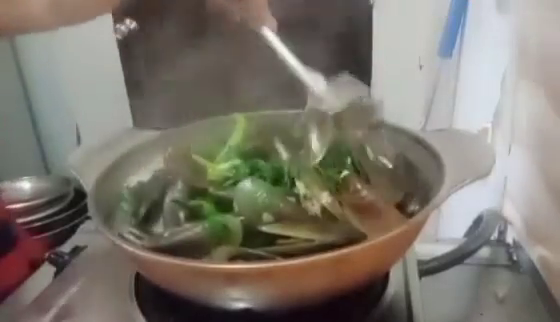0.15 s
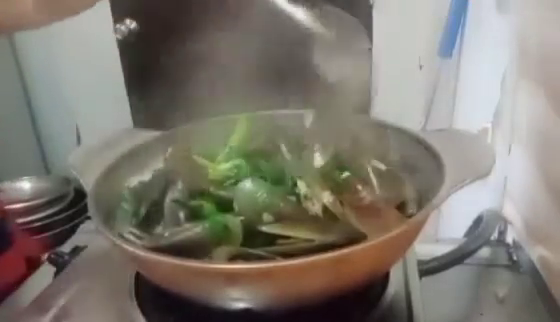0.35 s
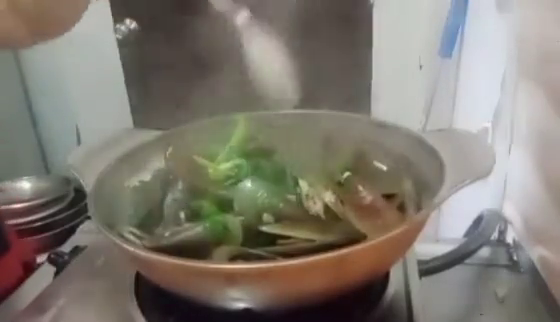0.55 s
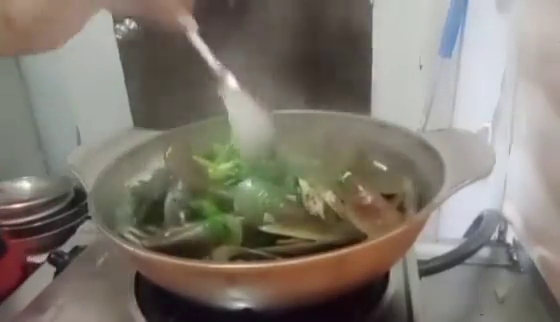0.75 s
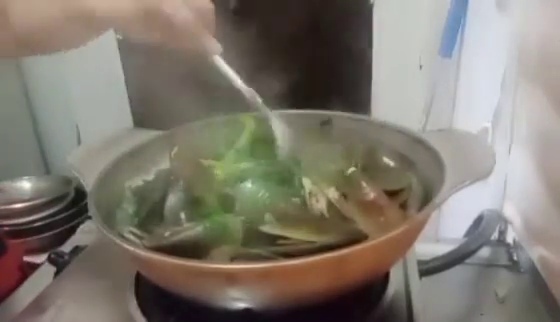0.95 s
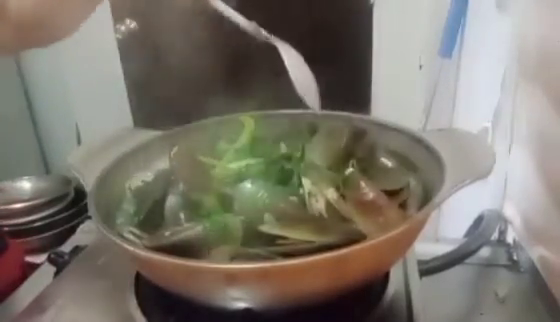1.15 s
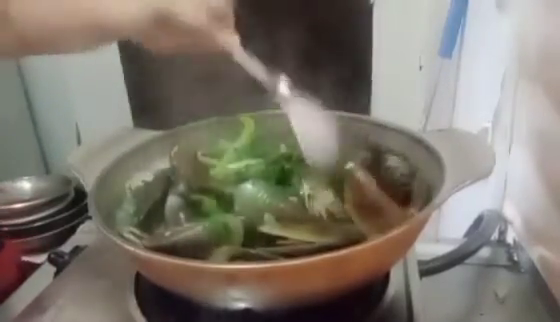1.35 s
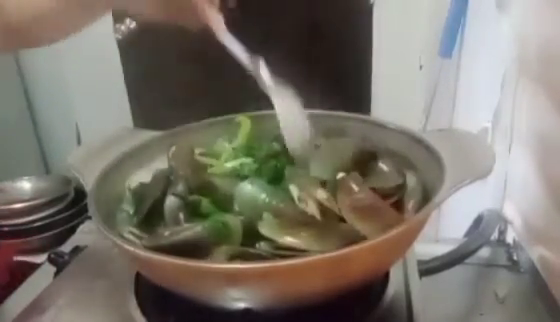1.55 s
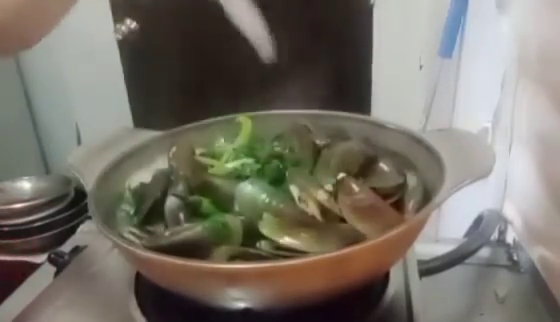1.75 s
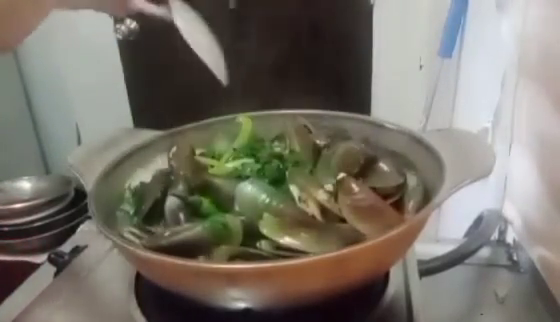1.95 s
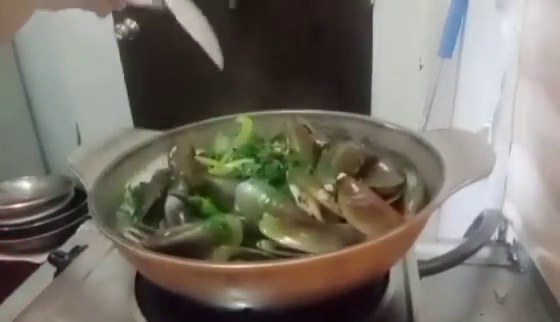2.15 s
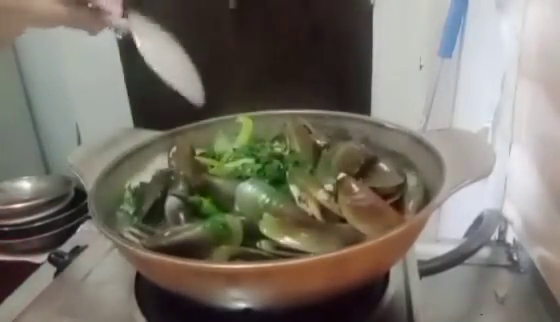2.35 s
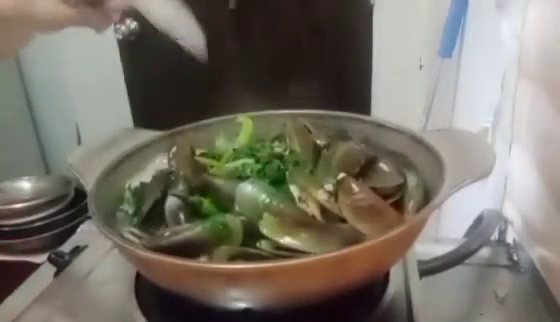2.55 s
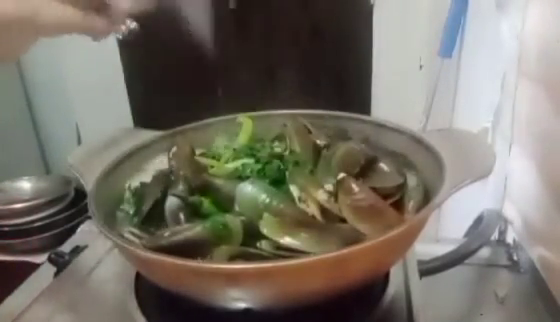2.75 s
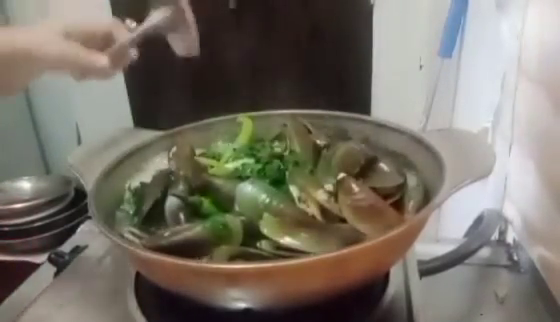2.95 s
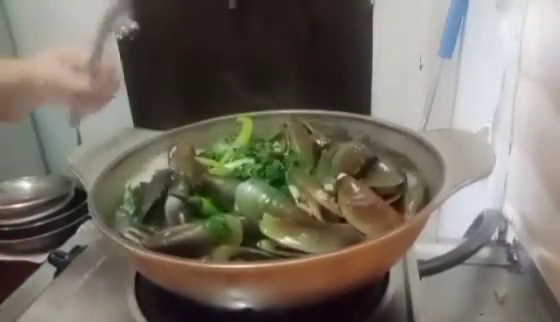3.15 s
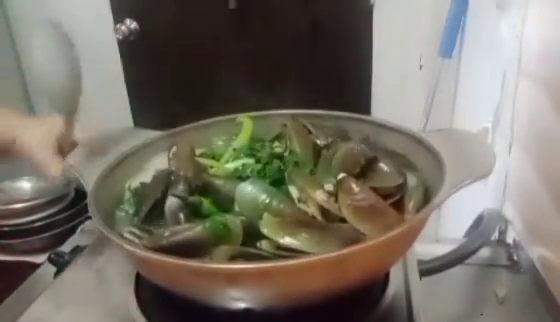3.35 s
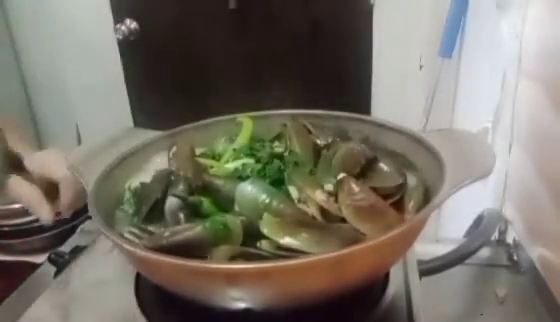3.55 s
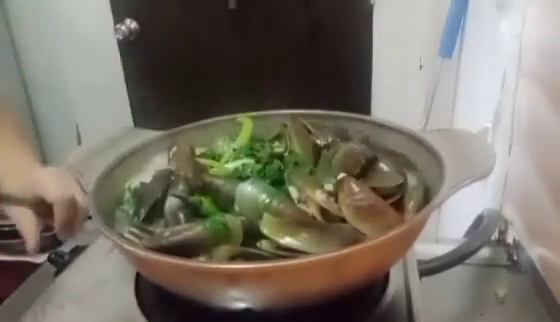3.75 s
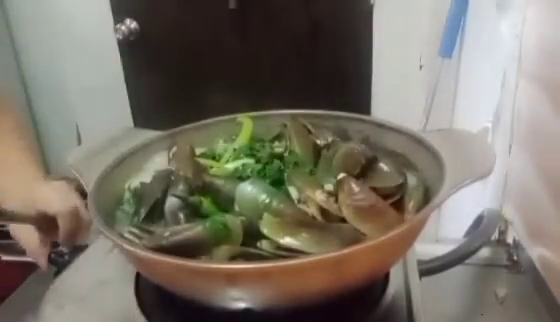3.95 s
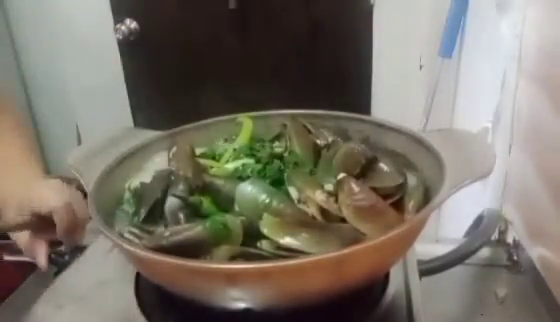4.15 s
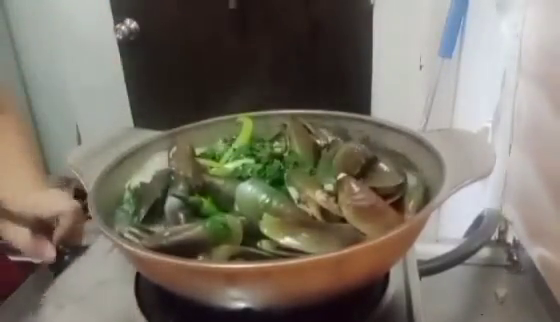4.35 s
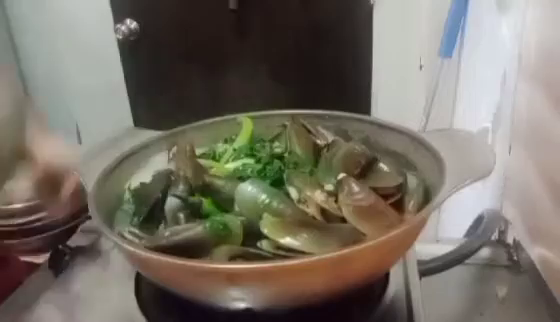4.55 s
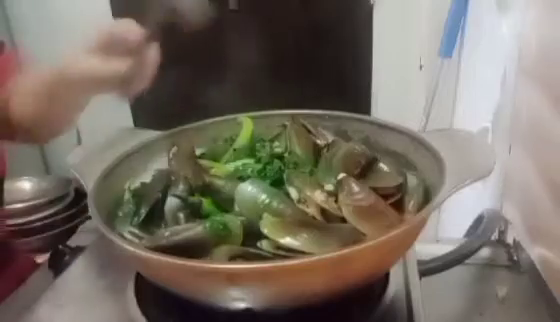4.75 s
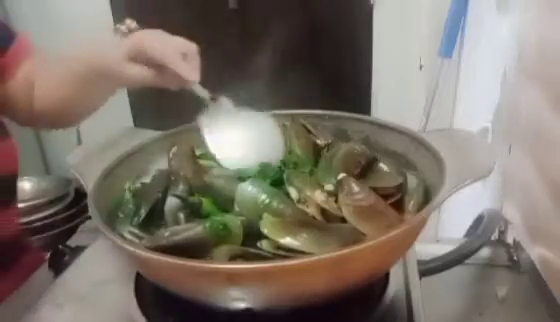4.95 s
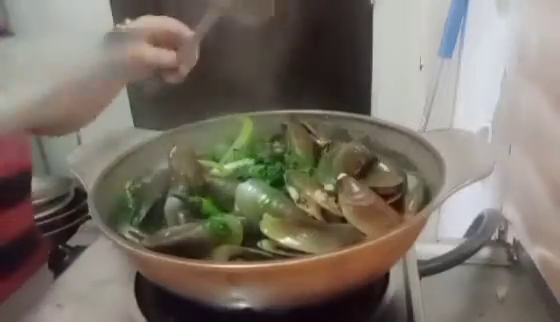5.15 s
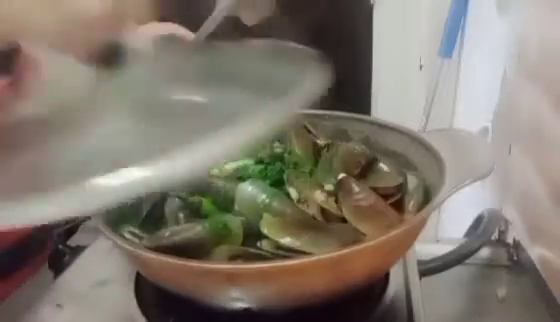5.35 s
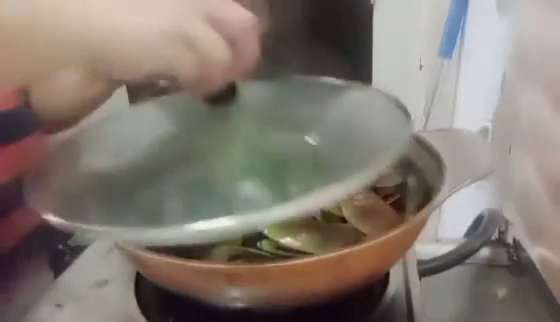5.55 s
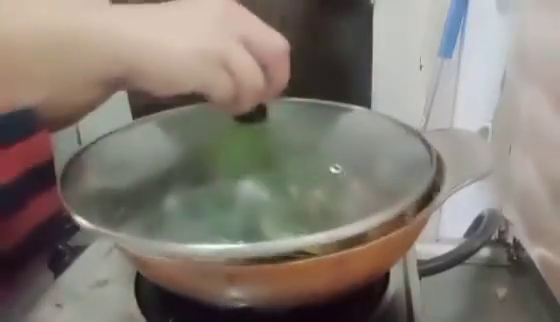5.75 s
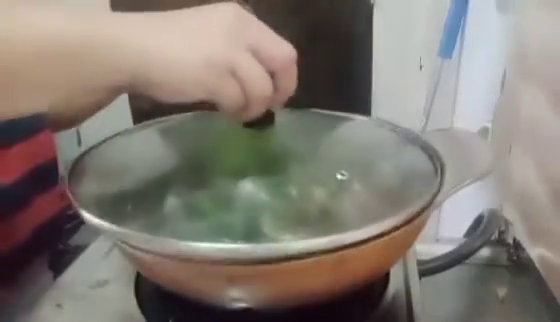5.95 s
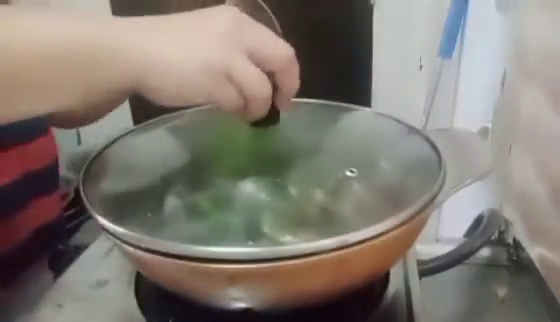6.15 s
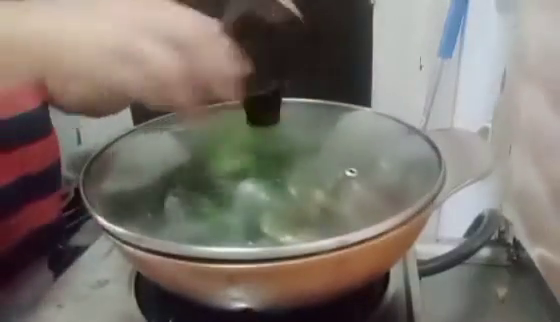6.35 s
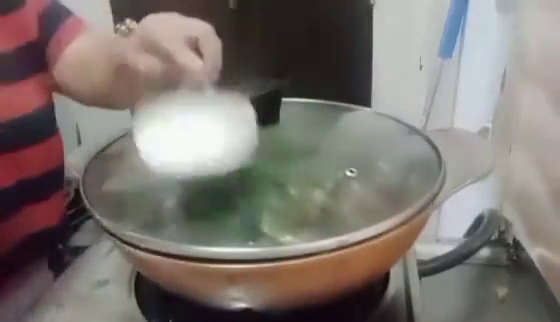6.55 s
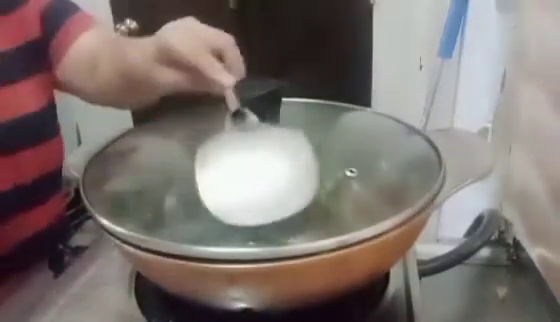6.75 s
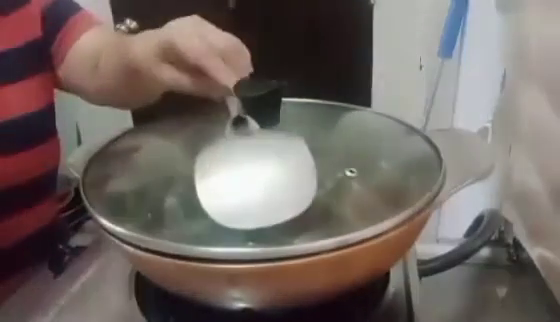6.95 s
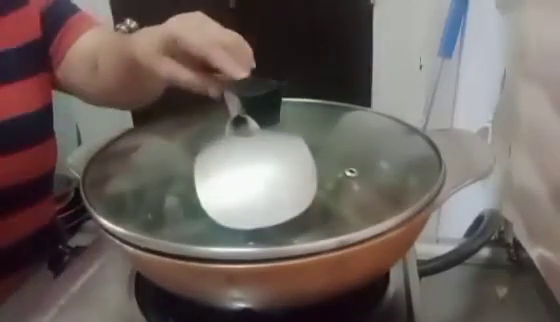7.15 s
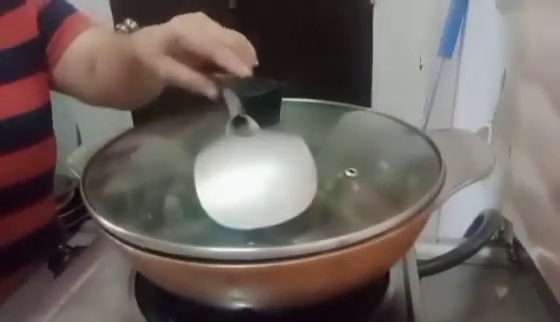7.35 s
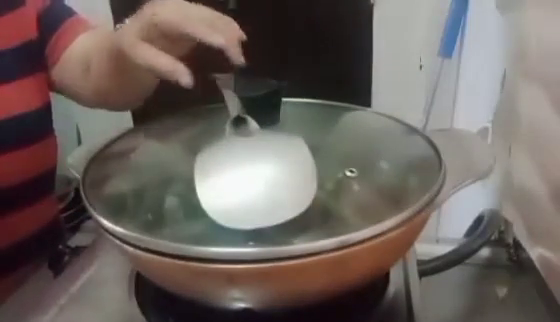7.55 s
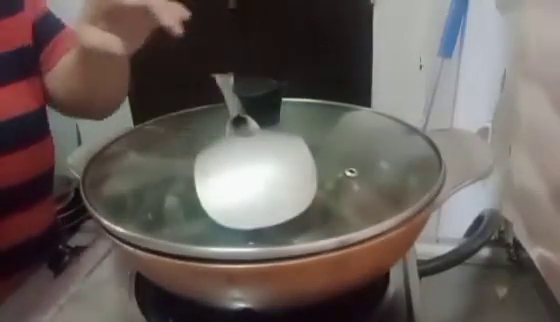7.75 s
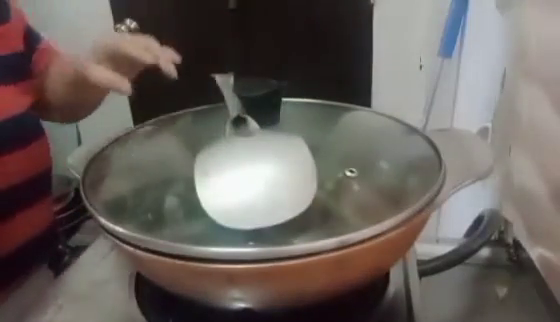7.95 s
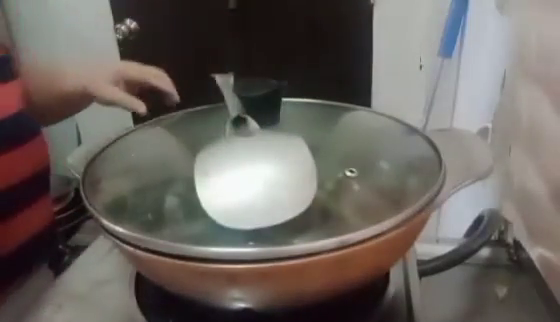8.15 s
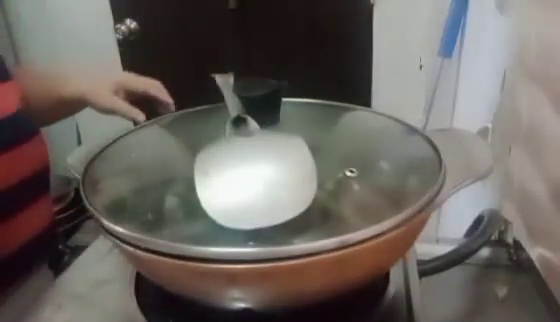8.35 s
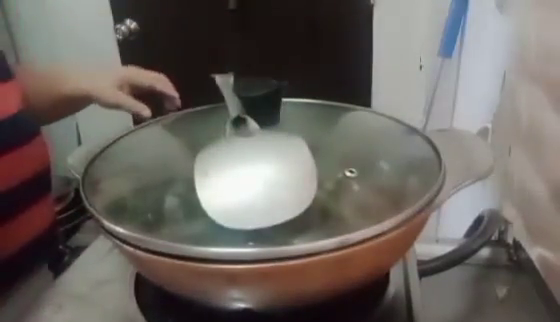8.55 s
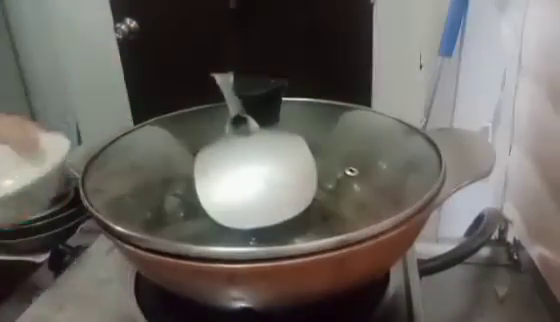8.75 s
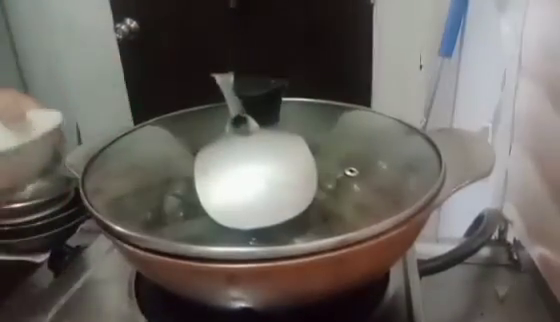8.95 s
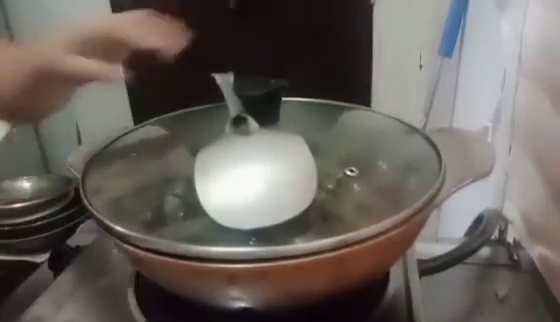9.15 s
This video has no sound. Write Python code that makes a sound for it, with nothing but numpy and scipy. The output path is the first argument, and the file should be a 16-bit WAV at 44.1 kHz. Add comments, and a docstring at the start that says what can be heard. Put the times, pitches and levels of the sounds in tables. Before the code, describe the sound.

Shells and pan knock sharply under a stirring spoon, simmering bubbles pop, a stove knob snaps, a glass lid settles, and a metal spoon rattles onto it.

```python
"""Mussels simmering in a pan

A metal spoon knocks shells and pan, the gas knob clicks off, a glass lid is set on and the spoon clatters
down on it; the simmer grows quieter, the sound drops out briefly and fades back in.
Impacts are noise bursts through the modes of the struck object, rubbing is shaped gritty noise, bubbles are
short chirps, and the stove and room are noises with drawn spectra under a wavering hum of sines."""
import sys
import numpy as np
from scipy import signal
from scipy.io import wavfile
from scipy.ndimage import uniform_filter1d

SR = 44100
rng = np.random.default_rng(int(sys.argv[2]) if len(sys.argv) > 2 else 0)


def generate_wav(signal):
    """Clip the signal to [-1, 1] and save it as 16-bit WAV at the path in sys.argv[1]."""
    frames = np.transpose(np.atleast_2d(signal))
    scaled = np.clip(frames, -1, 1) * 32767
    pcm = np.round(scaled).astype(np.int16)
    wavfile.write(sys.argv[1], SR, pcm)


N = 405719  # samples

# All source levels hold in the mix, ahead of the output gain. Contacts: start_s, level_db (peak of the clack
# before microphone colour), bass_db and treble_db (re clack), pitch_hz, tail_db (re crack) The stirring
# contacts are knocks on shells, with dull blows on the pan among them (the rows with strong bass); all of them
# ring through the shell modes.
STIRRING_CONTACTS = [(0.0144, -28, -24, -16.5, 2370, 5), (0.0596, -2.5, -45, -18.5, 3240, -11.5),
                     (0.134, -24, -22, -18, 2600, -10), (0.188, -14.5, -27, -16.5, 1530, -14),
                     (0.2176, -21, -24, -20, 3800, -22), (0.2498, -4, -37, -17, 3000, -8.5),
                     (0.3828, -25.5, -30, -16, 2900, 5), (0.4375, -15, -40, -8, 2640, -4),
                     (0.4717, -17, -2, -5.5, 2680, -4), (0.5103, -10.5, -19, 1.5, 2720, -13.5),
                     (0.8116, -31, -3, -18, 1320, -12), (1.0259, -22, -26.5, -23.5, 3600, -1),
                     (1.071, -7.5, -43, -16.5, 2210, -5.5), (1.0967, -6.5, -49, 2.5, 3030, -20.5),
                     (1.1272, -2, -45.5, 4, 2540, -12.5), (1.1738, -15, -29, -5.5, 2170, -0.5),
                     (1.2413, -16, -20, -3, 2220, -6), (1.292, -22, -11, -13, 2180, -23),
                     (1.3179, -18.5, -5, -41, 2390, -17), (1.4494, -30, -4, -30, 2200, -8),
                     (1.5803, -36.5, 1.5, -9.5, 2040, -27), (1.6137, -21, -2.5, 3.5, 1250, -27.5),
                     (1.6812, -23.5, -1, -6, 2680, -16)]
PAN_CONTACTS = [(0.5646, -17, 10.5, -4, 1250, -9), (0.7104, -14.5, 4, -32.5, 1140, -9.5),
                (0.8544, -1.5, -9, -10.5, 1240, -19.5), (1.712, -8, -19, -22, 2430, -22),
                (1.7411, -12, 2.5, -15.5, 1310, -18.5), (1.79, -32, 22, -13, 3200, -13)]
KNOB_CONTACTS = [(4.0088, -25, -16.5, -6, 1520, -15), (4.0701, -2.5, -26.5, 2.1, 2180, -3.5),
                 (4.0823, -7.5, -20.5, 7, 3660, -18.5)]
LID_CONTACTS = [(5.335, -14, -6.5, -50, 1020, -9.5), (5.612, -38, 7.5, -9, 1050, -8),
                (5.647, -33.5, 2, -16, 840, -4), (5.711, -26, -5.5, -17, 1570, -11),
                (5.804, -35, -11, -41, 980, -5), (5.858, -39.5, -17, -19, 1110, 1)]
SPOON_CONTACTS = [(6.4379, -8, -19.5, 4, 1870, -4.5), (6.459, -5.5, -46, -2, 4000, -11),
                  (6.4894, -27, -38, 2, 2730, -21), (6.5165, -7.5, -20.5, -6, 2250, 6),
                  (6.521, -11.5, -35, 10, 3780, -8.5), (6.5322, -17, -14, 2, 2640, 16),
                  (6.5873, -16, -19, 0.5, 2050, -2), (6.6296, -8, -19.5, -10.5, 1990, -18),
                  (6.6499, -10.5, -35, 1.7, 1980, -3), (6.6865, -18.5, -24, -1, 1970, 5),
                  (6.7517, -33, -12, -14, 2430, 13)]
# Modes of each struck object: pitch_hz, width_hz, lift_db
SHELL_MODES = [(1500, 45, 2.5), (2320, 100, 9), (2720, 58, 10), (3300, 60, 14), (3780, 63, 9.5),
               (4103, 70, 11), (7200, 67, 2)]
PAN_MODES = [(1250, 45, 4.1), (1940, 330, 3.4), (3296, 80, 5), (7300, 850, 2.7)]
KNOB_MODES = [(1170, 150, 11.7), (4170, 770, 14), (4900, 1200, 12), (7750, 67, 2.6), (8300, 200, 4.7),
              (13100, 310, 7.3)]
LID_MODES = [(1084, 30, 15), (1250, 39, 4.6), (1410, 75, 9.6), (2710, 130, 6.5), (3270, 92, 1.5)]
SPOON_MODES = [(1900, 120, 11), (2202, 60, 10), (2740, 40, 14), (3400, 100, 6), (3822, 100, 12),
               (4200, 100, 10), (4860, 150, 14), (5650, 250, 20), (6300, 150, 10), (7305, 120, 6),
               (8600, 120, 8), (9383, 60, 11), (10450, 80, 10), (11810, 80, 8), (13020, 80, 8),
               (14730, 100, 8)]
# Microphone colour on the contacts: pitch_hz, gain_db
MICROPHONE_GAIN = [(900, -4.5), (2000, -1), (3800, -1.5), (5000, -14.5), (6300, -7.5), (7400, 6.5),
                   (9000, -6), (12000, -9.5), (15300, -6.5), (15900, -30)]

# Jolts that boom in pan and stove, and in the landing lid: start_s, level_db, hold_s
PAN_JOLTS = [(0.455, -32, 0.0027), (0.556, -18, 0.011), (0.72, -28.5, 0.044), (0.86, -28, 0.034),
             (1.255, -41, 0.0026), (1.31, -34, 0.028), (1.46, -40.5, 0.01), (1.6, -33, 0.081),
             (1.7, -17, 0.023), (1.74, -19.5, 0.053), (1.9, -37, 0.065), (2.46, -42.5, 0.11),
             (2.585, -42, 0.004), (2.65, -31.5, 0.004), (4.245, -43, 0.004), (4.31, -45.5, 0.084)]
LID_JOLTS = [(5.332, -23.5, -0.0018), (5.607, -39, 0), (5.708, -39.5, 0.016), (5.803, -44.5, 0.09)]
# Low resonances of those bodies: pitch_hz, width_hz, level_db
PAN_BODY = [(72.1, 36, -5.5), (131.8, 8.7, 0), (180.8, 12, 4.5), (262, 8.2, 2.5), (310, 35, 1),
            (416.6, 12, 4.5), (494, 12, 0.5), (579.8, 5.1, -2.5), (630, 29, -7.5), (670, 12, -8)]
LID_BODY = [(141, 23, -10.5), (182, 40, -4), (334.4, 17, 5), (429.4, 16.4, 7.5), (486, 7.6, 0),
            (537, 7.4, 0.5), (604, 16, -20.5)]

# Rubbing strokes, gritty and smoother: start_s, level_db, hold_s
SCRAPES = [(0.43, -40.5, 0.12), (0.56, -35, 0.008), (1.12, -34.5, 0.006), (1.25, -36.5, 0.012),
           (1.608, -37, 0.09), (1.708, -24.5, 0.03), (1.9, -42.5, 0.04)]
WIPES = [(2.46, -38, 0.15), (2.61, -36.5, 0.031), (5.43, -53.5, 0.075)]
# Spectra of spoon through shells and of smoother sliding: pitch_hz, density_db (per Hz, relative)
SCRAPE_SPECTRUM = [(180, -34.5), (300, -13), (769, -18), (892, -20.5), (1260, -10.5), (2880, -14.5),
                   (3340, -13.5), (5390, -35.5), (7500, -19.5), (15500, -52.5)]
WIPE_SPECTRUM = [(290, -42), (500, -2.5), (569, -17), (968, -14), (1430, -2.5), (1670, -9), (3010, -0.5),
                 (5130, -23.5), (7890, -12), (9650, -28.5), (15500, -31)]

# Clear rings of rim, plate and lid, and a low thrum: start_s, level_db, t60_s
RIM_RINGS = [(.58, -34, 0.17), (.875, -36, 0.21), (1.745, -31.5, 0.32)]
PLATE_RINGS = [(3.68, -45.5, 1), (4.03, -37.5, 0.13), (4.07, -26, 0.33)]
LID_RINGS = [(5.336, -37.5, 0.44), (5.46, -43.5, 1), (5.65, -43.5, 0.43), (5.712, -46, 0.34)]
THRUMS = [(4.315, -23.5, 0.19)]
# Partials of each: pitch_hz, level_db
RIM_PARTIALS = [(3214, 6.5), (7500, -13), (9173, -8.5), (10700, -12), (12320, -11.5), (14100, -12)]
PLATE_PARTIALS = [(420, 0.0043)]
LID_PARTIALS = [(490, -0.5), (552, 1.8), (1060, -11), (2697, -8)]
THRUM_PARTIALS = [(270, 0.0033)]

# Large bubbles bursting, and a soft knock under the lid: start_s, level_db (peak), spit_db (re peak), pitch_hz
POPS = [(2.08, -37.5, -17, 2030), (2.1565, -33, -22, 1960), (2.2544, -32, -26, 2080),
        (2.2742, -29.5, -32, 2090), (2.344, -37.5, -14, 3700), (2.379, -30.5, -17, 2500),
        (2.798, -38.5, -40, 3200), (2.902, -31, -22, 1720), (3.058, -36, -16, 2290),
        (3.126, -35, -23.5, 1890), (3.1652, -34, -15, 2170), (3.346, -30.5, -24, 2040),
        (3.5099, -30.5, -31, 2220), (3.551, -34, -31, 1770), (3.6466, -32.5, -26, 2180),
        (3.724, -34.5, -16, 1880), (3.799, -38, -16, 2290), (3.8846, -36, -25.5, 1800),
        (3.981, -37.5, -2, 1800), (4.261, -31.5, -22, 1920), (4.358, -40, -23, 1990),
        (4.432, -33.5, -34, 1810), (4.488, -31, -18, 2040), (4.593, -37.5, -34, 1780),
        (4.701, -38.5, -19, 2320), (4.773, -32, -35, 2570), (4.795, -45, -24, 2160),
        (4.8638, -37, -18, 2260), (4.998, -41.5, -30, 2120)]
SOFT_KNOCKS = [(7.645, -45.5, -45, 890)]

# Course of the simmer: time_s, hiss_db, rumble_db
SIMMER_LEVELS = [(0, -41.5, -50.5), (1.4, -49, -48.5), (2.6, -46.5, -45.5), (3.9, -44, -47),
                 (5.0, -52.5, -51), (5.6, -60.5, -50.5), (5.9, -65, -55), (7.3, -67.5, -59),
                 (8.378, -63, -58), (8.602, -79.5, -76.5), (9.2, -76, -79)]
# Spectra of broth, gas jet, low rumble and room air: pitch_hz, density_db (per Hz, relative)
HISS_SPECTRUM = [(210, -32), (350, -5), (740, -1.5), (1200, -2.5), (1500, -8), (1900, -6.5), (2400, -9),
                 (3800, -19), (5000, -35.5), (6100, -29.5), (7400, -16), (9500, -36), (15400, -39.5),
                 (15900, -65.5)]
GAS_SPECTRUM = [(4000, -38), (5200, -27), (6300, -13), (6800, 2), (7500, 0), (8300, -15), (9500, -25.5),
                (12300, -18.5), (15300, -14), (15800, -63)]
RUMBLE_SPECTRUM = [(18, -48.5), (30, -20.5), (92, -6), (135, 5.5), (286, -4), (367, -19), (419, -7),
                   (459, -23.5), (538, -17.5), (700, -18), (910, -41.5), (1540, -120)]
KITCHEN_SPECTRUM = [(15, -47), (25, -17.5), (137, 7.5), (351, -15), (413, -3.5), (878, -22), (951, -6),
                    (1430, -17), (2870, -7), (7580, -25.5), (15700, -25.5)]
# Partials of a distant motor: pitch_hz (at full speed), level_db (before swell and waver)
HUM_PARTIALS = [(131, -59.5), (186, -65), (253.0, -69), (301.5, -66), (452.2, -76), (500.6, -78),
                (554.5, -71), (602.9, -74), (705.2, -79)]
# Course of the hum: time_s, gain_db, speed_ratio (re full speed)
HUM_SWELL = [(5.9, -10, 1), (6.8, -1, 0.95), (7.4, -1.5, 0.97), (7.699, 1, .999), (8.3, -6, .999)]
# Output gain with the dropout: time_s, gain_db
OUTPUT_GAIN = [(8.38, 2.5), (8.396, -61), (8.58, -70.5), (8.6, -23.5), (8.759, 11.5)]

BUBBLES_PER_S, BUBBLES_DB = 63, -10.5  # level re hiss
BUBBLES_SINK_S, BUBBLES_SINK_DB = 4.8, -10.5  # from here on they sink into the hiss
GAS_DB, GAS_OFF_S = -66, 4.02  # jet level, and the end of its fade
KITCHEN_DB = -74.5
HEADROOM = .85  # ceiling of the soft limit, re full scale
EDGE_HZ = 16600  # upper band limit


def knocks(rows, modes, crack_s, low_hz, t60_s):
    """Modal impact: a tick, a crack and a noisy tail from pan and walls excite the modes of the struck object."""
    t = np.arange(SR // 2) / SR
    out = np.zeros(N)
    for start_s, level_db, bass_db, treble_db, pitch_hz, tail_db in rows:
        tail = amp(tail_db - 60 * t / t60_s - 20 * (t / 0.27) ** 2)
        burst = rng.standard_normal(len(t)) * (np.exp(-t / crack_s) + tail)
        burst[:3] += 1.5  # a blunt tick
        crack = burst * np.exp(-t / 0.029)  # the small piece struck rings only at first
        share_db = 2.2 * rng.standard_normal(len(modes))  # where it lands sets each mode's share
        modal = sum(amp(lift_db + share) * ring(burst, hz, width_hz)
                    for (hz, width_hz, lift_db), share in zip(modes, share_db))
        burst = burst + modal
        clack = band(burst, low_hz, 5000) + 3.4 * ring(crack, pitch_hz, pitch_hz / 5)
        hiss = band(burst, 4600, 15000)
        thud_shape = amp(-60 * t / t60_s) * (1 - np.exp(-t / 0.0026))
        thud = band(rng.standard_normal(len(t)) * thud_shape, 120, 700)
        sound = unit_peak(clack) + amp(treble_db) * unit_peak(hiss) + amp(bass_db) * unit_peak(thud)
        add(out, start_s, amp(level_db) * sound)
    return microphone(out)


def microphone(x):
    """Minimum-phase filtering: the small microphone dips near 5 kHz and peaks near 7 kHz, causally."""
    log_gain = curve_at(MICROPHONE_GAIN, abs(np.fft.fftfreq(4096, 1 / SR))) * np.log(10) / 20
    spectrum = np.exp(np.conj(signal.hilbert(log_gain)))  # phase follows from the log gain
    response = np.fft.ifft(spectrum).real[:1024]
    return signal.oaconvolve(x, response)[:N]


def boom(strength, body):
    """Forced vibration: shaking drives the low resonances of a large body, its strength set by the hand."""
    shake = noise([(50, -55), (64, 4), (750, -8), (1200, -25.5), (3000, -62)], 1, 0.59, size=1024)
    sound = 0.051 * band(shake, 59, 900)
    sound += sum(amp(db) * ring(shake, hz, width_hz) for hz, width_hz, db in body)
    running_level = np.sqrt(smooth_twice(sound ** 2, 1200))
    return band(strength * sound / running_level, 58, 1600)  # level follows the strokes alone


def scrapes():
    """Dry friction: grains catching and slipping make patchy noise that follows each stroke."""
    gritty = noise(SCRAPE_SPECTRUM, 2.5, 1.8, size=256)
    smoother = noise(WIPE_SPECTRUM, 1.7, 0.71, size=256)
    return (strokes(SCRAPES, rise_s=0.008, fall_db_per_s=150) * gritty
            + strokes(WIPES, rise_s=0.028, fall_db_per_s=290) * smoother)


def ringing(rows, partials, rise_s, width_hz, steady):
    """Free decay: partials, part steady sine and part narrow-band noise, build up and die exponentially."""
    t = np.arange(SR // 2) / SR
    out = np.zeros(N)
    for start_s, level_db, t60_s in rows:
        for hz, part_db in partials:
            raw = rng.standard_normal(len(t) + 4000)
            waver = unit_rms(ring(raw, hz, width_hz)[4000:])  # the filter's onset is left out
            tone = steady * np.sqrt(2) * np.sin(2 * np.pi * hz * t) + (1 - steady) * waver
            decay = amp(level_db + part_db - 60 * t / t60_s)
            add(out, start_s, decay * (1 - np.exp(-t / rise_s)) ** 2 * tone)
    return out


def pops(rows, length_s):
    """Cavity resonance: a bubble cluster sputters at its own pitch, spits a little spray, leaves a wet tail."""
    t = np.arange(SR // 5) / SR
    out = np.zeros(N)
    for start_s, level_db, spit_db, pitch_hz in rows:
        flutter = 1 + 0.61 * np.cos(2 * np.pi * rng.uniform(50, 90) * t)
        sputter = np.exp(-(t / length_s) ** 2) * flutter
        wet_tail = amp(-23.0 - 60 * t / 0.11)
        shape = .5 * np.exp(-t / 0.0016) + 0.14 * sputter + wet_tail
        burst = rng.standard_normal(len(t)) * shape
        blob = ring(ring(burst, pitch_hz, pitch_hz / 5.5), pitch_hz, pitch_hz / 2.0)
        blob += 0.044 * band(band(burst, 610, 4100), 700, 4100)
        spit = band(band(burst, 6300, 15000), 6300, 15000)
        add(out, start_s, amp(level_db) * (unit_peak(blob) + amp(spit_db) * unit_peak(spit)))
    return out


def bubbles():
    """Bubble resonance: small bursts at random times are damped rising chirps, a few large, with a brief tail."""
    bursts = rng.random(N) < BUBBLES_PER_S / SR
    size = amp(4.0 * np.minimum(rng.exponential(1, N), 3)) * bursts
    kind = rng.integers(0, 24, N)
    t = np.arange(1500) / SR
    out = np.zeros(N)
    for k, hz in enumerate(np.geomspace(600, 3600, 24)):
        shape = np.exp(-t * hz / 10.0) * (1 - np.exp(-t * hz))
        chirp = np.sin(2 * np.pi * hz * t * (1 + 8 * t)) * shape
        out += signal.oaconvolve(size * (kind == k), chirp)[:N]
    echo = rng.standard_normal(2500) * amp(-15 - 60 * np.arange(2500) / SR / 0.062)
    return unit_rms(out + signal.oaconvolve(out, echo)[:N])


def broth():
    """Boiling noise: a dense hiss with single bubbles on top, both following the simmer's level."""
    t = np.arange(N) / SR
    time_s, hiss_db, _ = np.transpose(SIMMER_LEVELS)
    bubble_db = BUBBLES_DB + BUBBLES_SINK_DB * (t > BUBBLES_SINK_S)
    sound = noise(HISS_SPECTRUM, 3.1, 1.1) + amp(bubble_db) * bubbles()
    return amp(np.interp(t, time_s, hiss_db)) * sound


def gas_jet():
    """Jet turbulence: broad noise and a narrow whistle, fading out over the last 50 ms."""
    t = np.arange(N) / SR
    whistle = unit_rms(ring(rng.standard_normal(N), hz=6730, width_hz=70))
    jet = noise(GAS_SPECTRUM, 0.85, 1.0) + amp(2.6) * whistle
    return amp(GAS_DB) * jet * np.clip((GAS_OFF_S - t) / .05, 0, 1)


def rumble():
    """Low-frequency turbulence: the stove's rumble is slow patchy noise with a drawn level."""
    time_s, _, rumble_db = np.transpose(SIMMER_LEVELS)
    level = amp(np.interp(np.arange(N) / SR, time_s, rumble_db))
    return level * noise(RUMBLE_SPECTRUM, 3.3, 0.59, size=2048)


def hum():
    """Rotating-source partials: all pitches follow one speed, each partial wavering in strength by itself."""
    t = np.arange(N) / SR
    time_s, gain_db, speed = np.transpose(HUM_SWELL)
    turns = np.cumsum(np.interp(t, time_s, speed)) / SR  # phase is the integral of speed
    tones = np.zeros(N)
    for hz, level_db in HUM_PARTIALS:
        waver = unit_rms(smooth_twice(rng.standard_normal(N), 6000))
        tones += amp(level_db + 3.5 * waver) * np.sqrt(2) * np.sin(2 * np.pi * hz * turns)
    return tones * amp(np.interp(t, time_s, gain_db)) * (t < OUTPUT_GAIN[1][0])  # ends at the dropout


def room_air():
    """Ambient noise: the kitchen air is steady-level noise with a drawn spectrum."""
    return amp(KITCHEN_DB) * noise(KITCHEN_SPECTRUM, 1.5, 0.94, size=1024)


def noise(spectrum, patchy_db, flicker_db, size=512):
    """Short-time synthesis: random spectra with drifting patches and a flicker shared by all bands."""
    hop = size // 4
    real, imag, patches = rng.standard_normal((N // hop + 5, size // 2 + 1, 3)).T
    flicker = unit_rms(uniform_filter1d(patches[0], size=5))
    patches = uniform_filter1d(patches, size=6, axis=0)  # across pitch
    patches = unit_rms(uniform_filter1d(patches, size=10, axis=1))  # across time
    db = curve_at(spectrum, np.fft.rfftfreq(size, 1 / SR))[:, None]
    db = db + patchy_db * patches + flicker_db * flicker
    frames = (real + 1j * imag) * amp(db)
    return unit_rms(signal.istft(frames, nperseg=size, noverlap=size - hop)[1][:N])


def strokes(rows, rise_s, fall_db_per_s):
    """Power addition: each effort swells in, holds, then dies away steadily; the powers add."""
    t = np.arange(N) / SR
    power = np.zeros(N)
    for start_s, level_db, hold_s in rows:
        rise = np.clip((t - start_s) / rise_s, 0, 1) ** 2
        falling_s = np.maximum(t - start_s - rise_s - hold_s, 0)
        power += (rise * amp(level_db - fall_db_per_s * falling_s)) ** 2
    return np.sqrt(power)


def ring(x, hz, width_hz):
    """Simple resonance: a two-pole filter of gain 1 at its peak."""
    return signal.lfilter(*signal.iirpeak(hz, hz / width_hz, SR), x)


def band(x, lo_hz, hi_hz):
    """Band-pass filtering: only what lies between two pitches is kept."""
    return signal.sosfilt(signal.butter(2, [lo_hz, hi_hz], "bandpass", fs=SR, output="sos"), x)


def smooth_twice(x, size):
    """Moving average, applied twice for a triangular window."""
    return uniform_filter1d(uniform_filter1d(x, size=size), size=size)


def curve_at(points, hz):
    """Logarithmic interpolation: a drawn curve is read along a log pitch axis."""
    point_hz, value = np.transpose(points)
    return np.interp(np.log(hz + 1), np.log(point_hz + 1), value)


def amp(db):
    """Decibel law: level to amplitude ratio."""
    return 10 ** (np.asarray(db) / 20)


def unit_rms(x):
    """Energy normalisation: root mean square of 1."""
    return x / np.sqrt(np.mean(x ** 2) + 1e-20)


def unit_peak(x):
    """Peak normalisation: largest excursion of 1."""
    return x / abs(x).max()


def add(mix, start_s, sound):
    """Superposition: a sound is summed into the mix from its start, in place."""
    part = mix[round(start_s * SR):][:len(sound)]
    part += sound[:len(part)]


def scene():
    """Superposition of all sources, from the impacts down to the room."""
    hits = knocks(STIRRING_CONTACTS, SHELL_MODES, crack_s=0.0012, low_hz=1000, t60_s=0.22)
    hits += knocks(PAN_CONTACTS, PAN_MODES, crack_s=.002, low_hz=900, t60_s=0.17)
    hits += knocks(KNOB_CONTACTS, KNOB_MODES, crack_s=0.003, low_hz=600, t60_s=0.28)
    hits += knocks(LID_CONTACTS, LID_MODES, crack_s=.0015, low_hz=790, t60_s=0.22)
    hits += knocks(SPOON_CONTACTS, SPOON_MODES, crack_s=0.003, low_hz=1500, t60_s=0.24)
    booms = boom(strokes(PAN_JOLTS, rise_s=0.022, fall_db_per_s=140), PAN_BODY)
    booms += boom(strokes(LID_JOLTS, rise_s=0.0029, fall_db_per_s=190), LID_BODY)
    rings = ringing(RIM_RINGS, RIM_PARTIALS, rise_s=0.004, width_hz=90, steady=0.41)
    rings += ringing(PLATE_RINGS, PLATE_PARTIALS, rise_s=0.0046, width_hz=12, steady=0.87)
    rings += ringing(LID_RINGS, LID_PARTIALS, rise_s=0.0027, width_hz=7.2, steady=0.4)
    rings += ringing(THRUMS, THRUM_PARTIALS, rise_s=0.009, width_hz=23, steady=0.62)
    bursts = pops(POPS, length_s=0.03) + pops(SOFT_KNOCKS, length_s=0.071)
    background = broth() + gas_jet() + rumble() + hum() + room_air()
    return (hits + booms + scrapes() + rings + bursts + background)[None]


def record(dry):
    """Gain, saturation, band limit: the sound cuts out and fades back in, and loud peaks are rounded off."""
    time_s, gain_db = np.transpose(OUTPUT_GAIN)
    gained = dry * amp(np.interp(np.arange(N) / SR, time_s, gain_db))
    rounded = HEADROOM * np.tanh(gained / HEADROOM)
    low_pass = signal.firwin(511, EDGE_HZ, window=("kaiser", 9), fs=SR)
    return signal.oaconvolve(rounded, low_pass[None], "same")


dry = scene()
out = record(dry)
generate_wav(out)
```